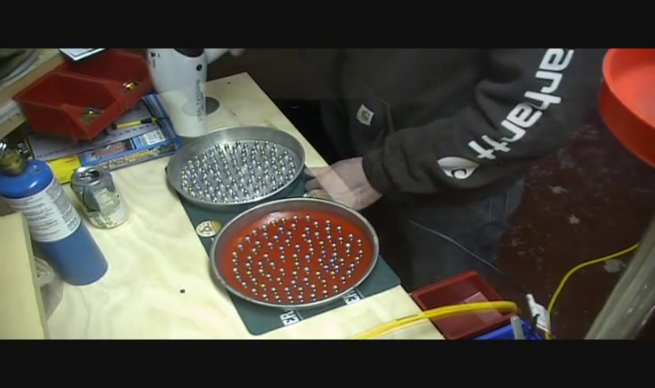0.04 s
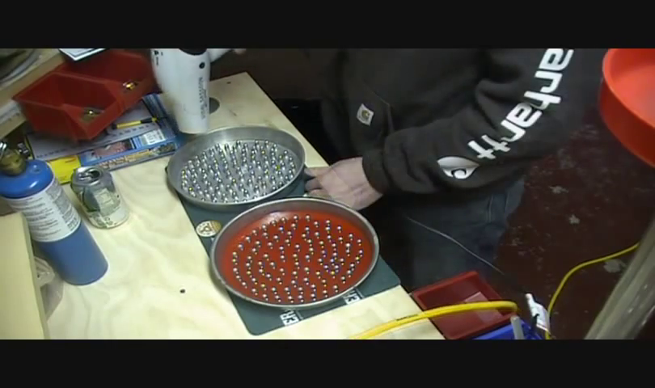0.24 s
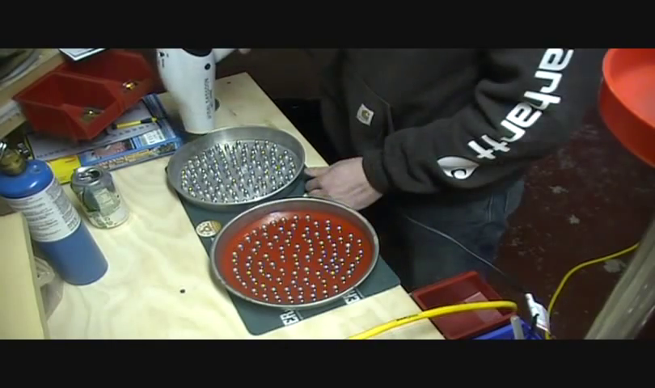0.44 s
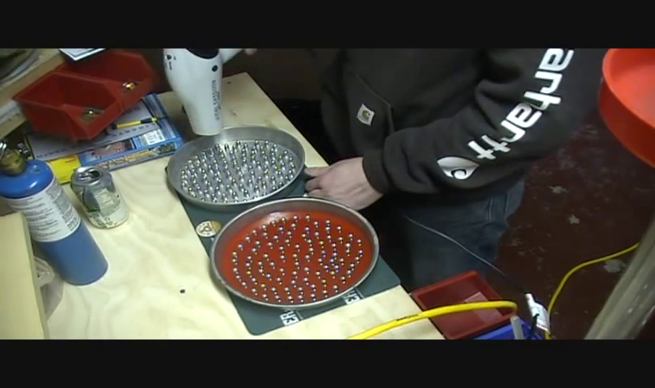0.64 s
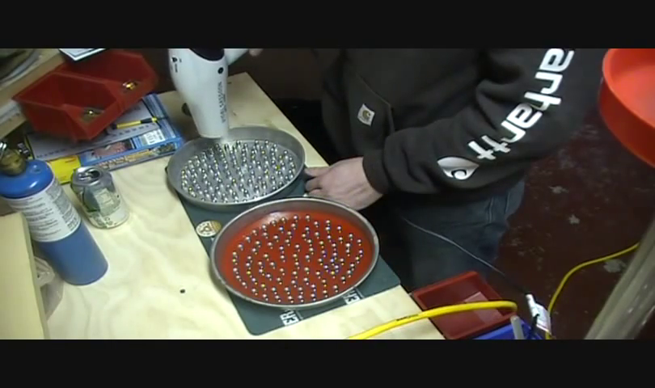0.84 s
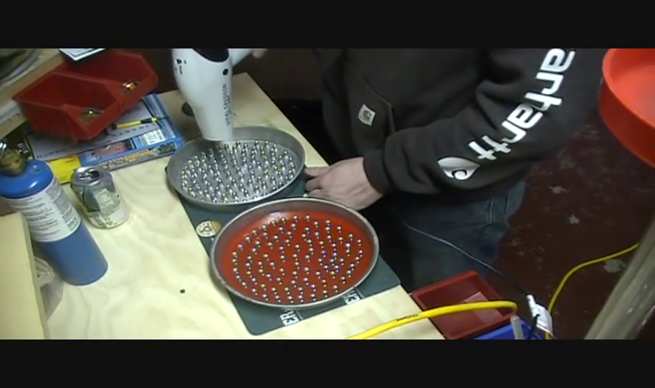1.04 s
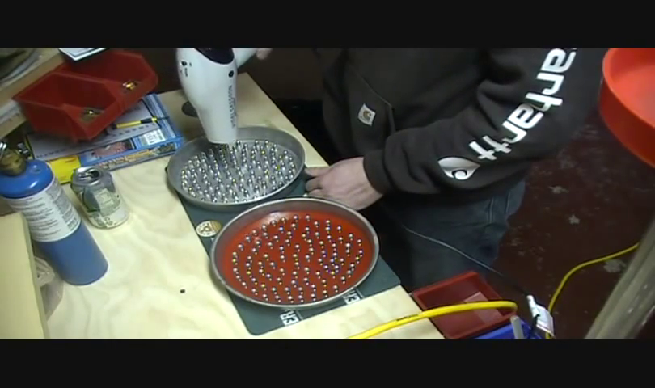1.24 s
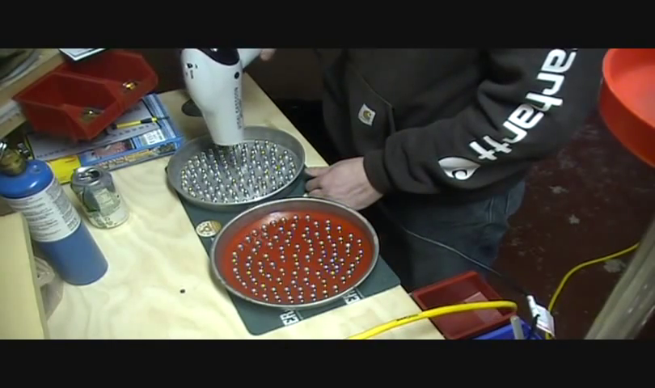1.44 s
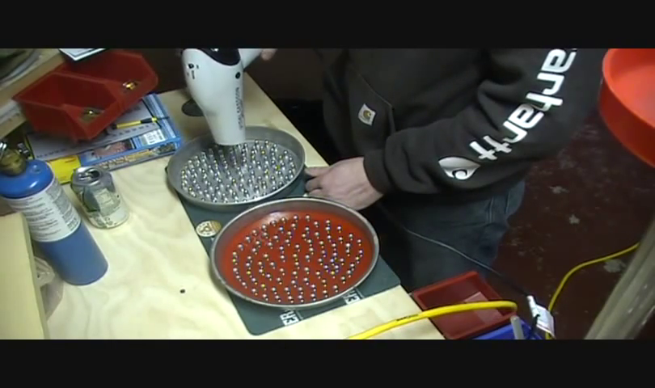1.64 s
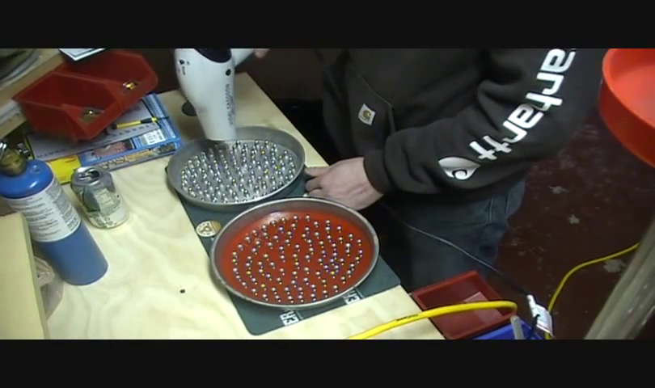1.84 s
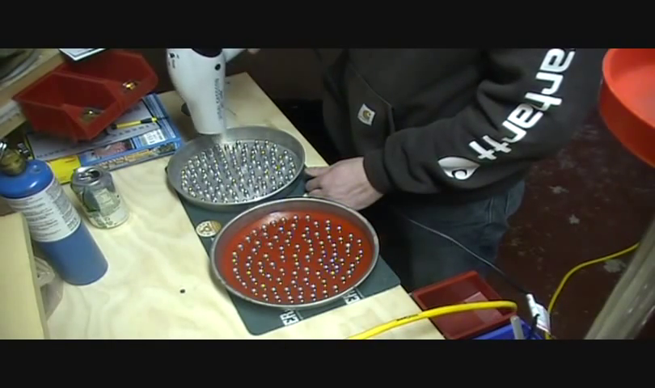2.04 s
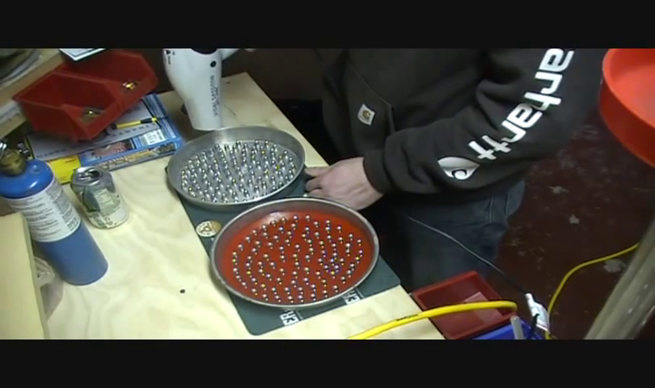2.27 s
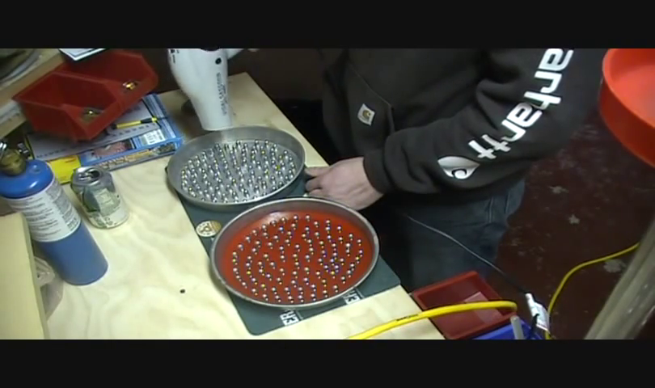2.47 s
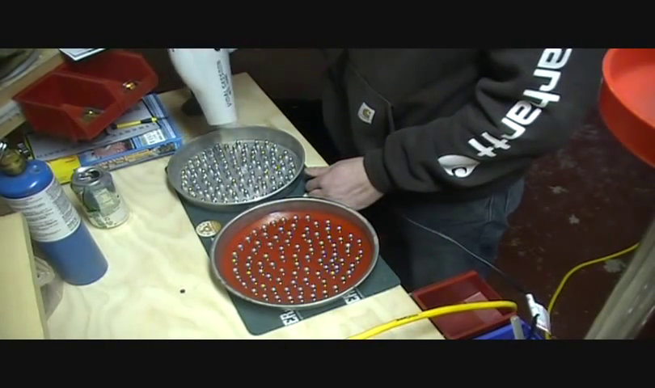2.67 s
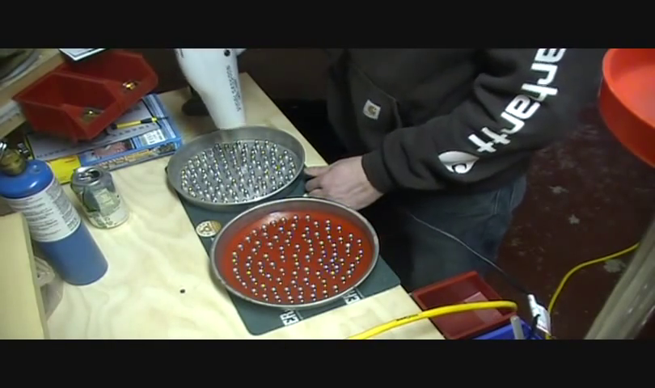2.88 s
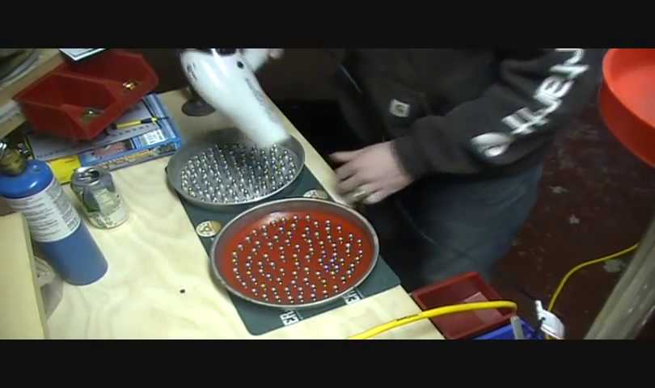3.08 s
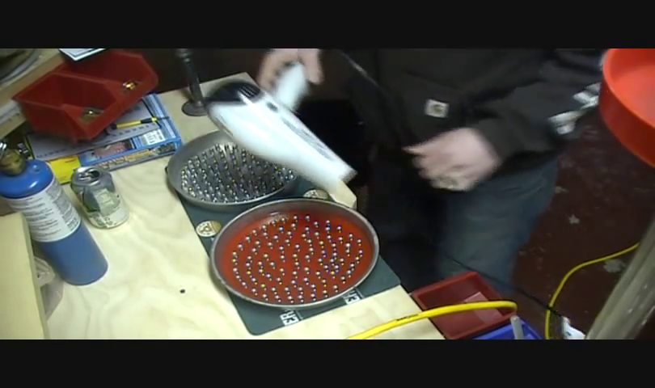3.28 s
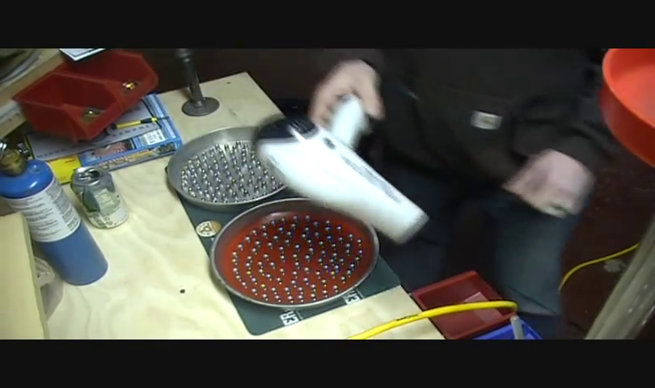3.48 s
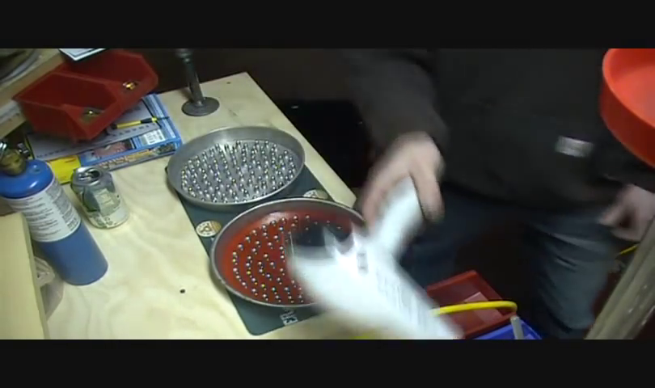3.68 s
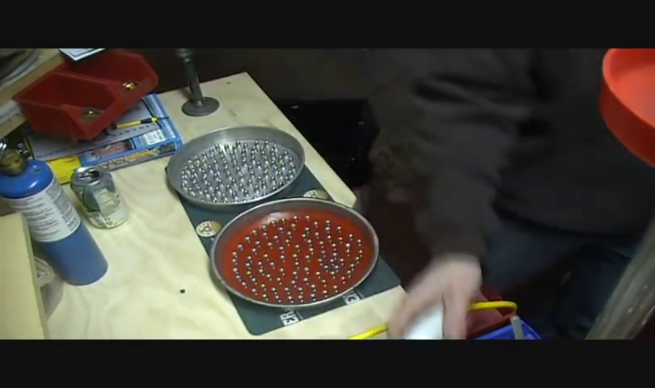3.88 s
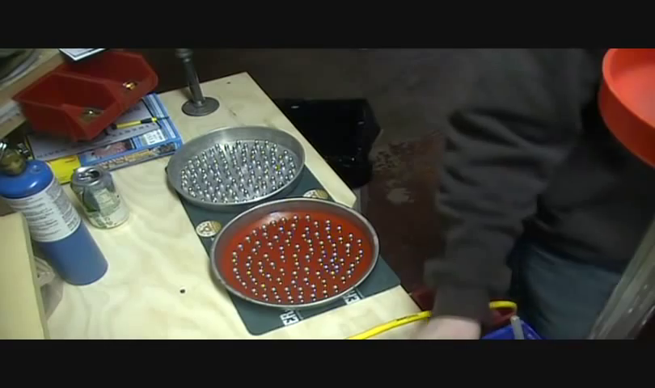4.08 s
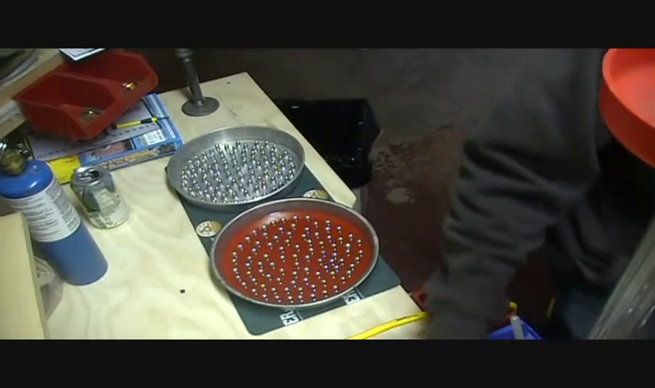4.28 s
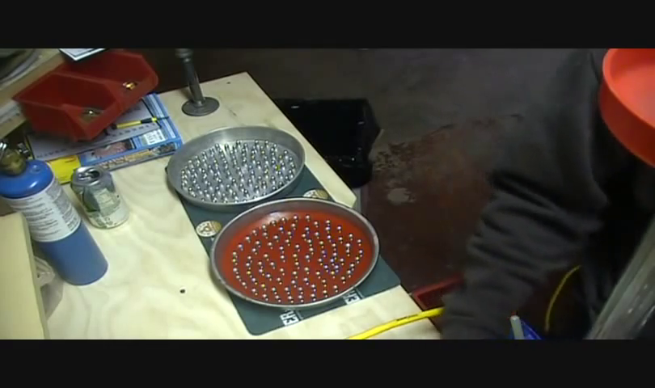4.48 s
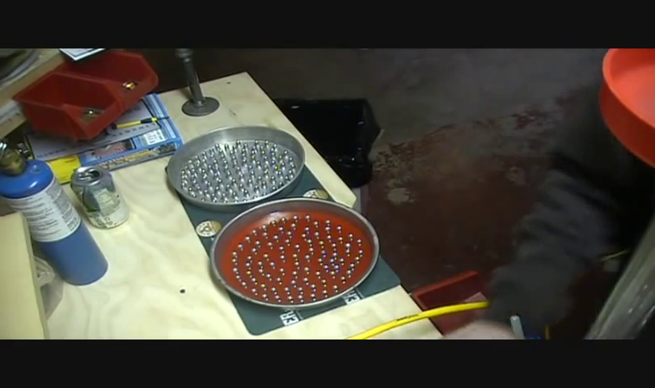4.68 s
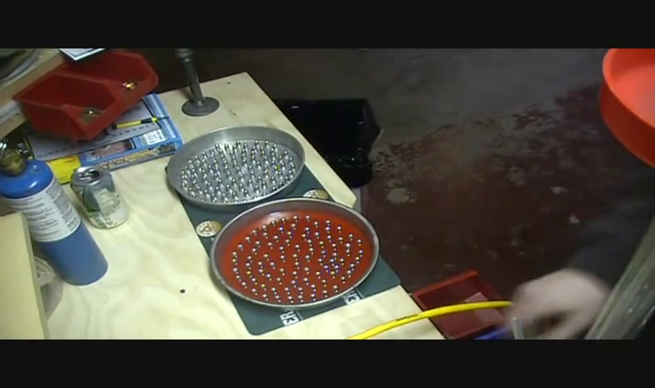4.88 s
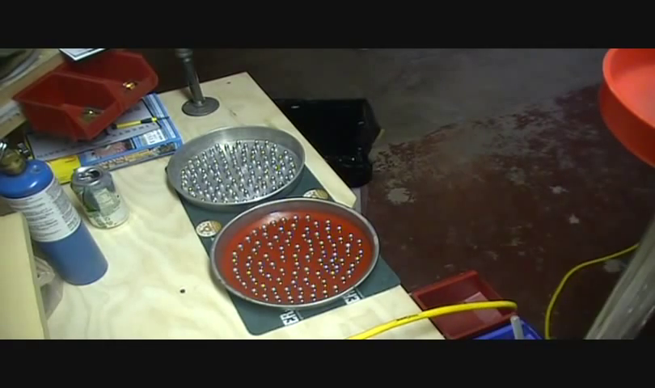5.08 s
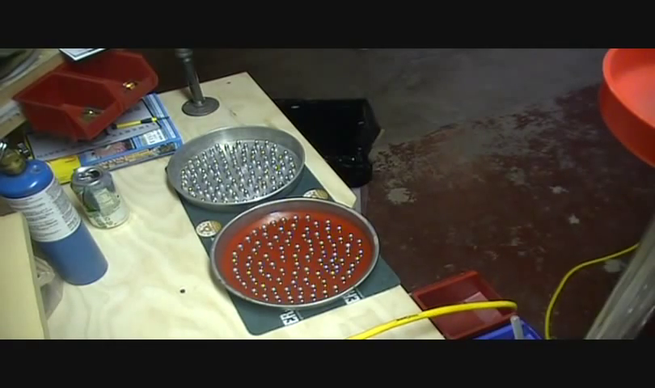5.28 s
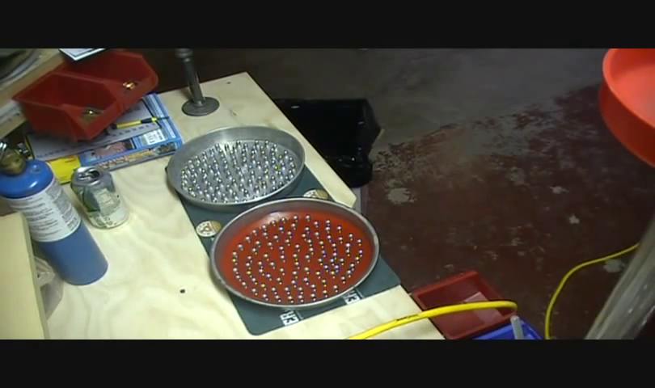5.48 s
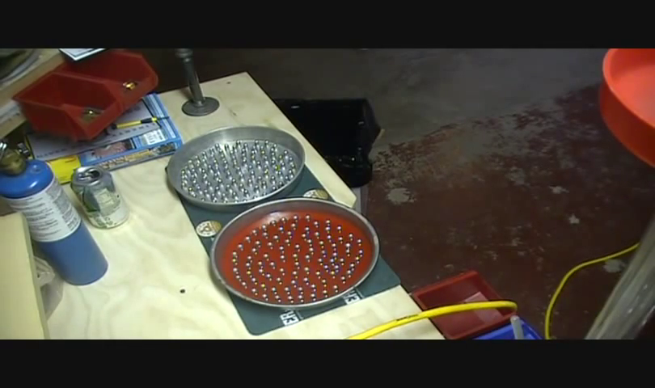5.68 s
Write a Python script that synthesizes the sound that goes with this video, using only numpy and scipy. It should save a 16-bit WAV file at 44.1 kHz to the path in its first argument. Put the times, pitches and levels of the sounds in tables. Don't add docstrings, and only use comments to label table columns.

```python
import sys
import numpy as np
from scipy import signal
from scipy.fft import rfft, irfft
from scipy.io import wavfile
from scipy.ndimage import uniform_filter1d

SR = 44100
rng = np.random.default_rng(int(sys.argv[2]) if len(sys.argv) > 2 else 0)


def rack_gain(trim_db):
    fader = np.asarray(trim_db, float)
    return 10 ** (fader / 20)


def digitize_waveform(pressure):
    field = np.atleast_2d(pressure).T
    bounded = np.clip(field, -1, 1)
    quanta = np.round(bounded * 32767).astype(np.int16)
    wavfile.write(sys.argv[1], SR, quanta)


N = 252252


def rms_one(x):
    return x / np.sqrt(np.mean(x ** 2) + 1e-20)


def in_time(rows):
    s, *columns = np.transpose(rows)
    return [np.interp(np.arange(N) / SR, s, c) for c in columns]


def at_hz(points, hz):
    return np.interp(np.log(hz), np.log(np.array(points)[:, 0]), np.array(points)[:, 1])


def drift(rate):
    r = np.exp(-80 * np.pi * rate / SR)
    slow = signal.lfilter([1], [1, -2 * r, r * r], rng.standard_normal(N // 40 + 2002))[2000:]
    return np.interp(np.arange(N) / 40, np.arange(len(slow)), rms_one(slow))


def ring(clicks, hz, t60):
    r = rack_gain(-60 / (max(t60, .001) * SR))
    w = 2 * np.pi * hz / SR
    return signal.lfilter([0, np.sin(w)], [1, -2 * r * np.cos(w), r * r], clicks + 1e-18)


def resonance(x, hz, width_hz):
    r = np.exp(-np.pi * width_hz / SR)
    poles = [1, -2 * r * np.cos(2 * np.pi * hz / SR), r * r]
    return signal.lfilter(np.array([1, 0, -1]) * (1 - r * r) / 2, poles, x)


def band_of(x, low_hz, high_hz):
    return signal.sosfilt(signal.butter(2, [low_hz, high_hz], "band", fs=SR, output="sos"), x)


def radiated(x, low_hz, high_hz):
    x = signal.sosfilt(signal.butter(3, low_hz, "high", fs=SR, output="sos"), x)
    return signal.sosfilt(signal.butter(4, high_hz, fs=SR, output="sos"), x)


# frequency in Hz, side minus mid in dB.
WIDTH = [(60, -15.5), (91, -17), (140, -24), (210, -16), (320, -17.5), (490, -18.5), (750, -14.5),
         (1150, -11.5), (1740, -15), (2660, -10), (4050, -13), (6180, -16.5), (9410, -1), (14300, -6.5)]


def to_pair(mid, side, colour_db=lambda hz: 0 * hz, wider_db=0):
    hz = np.maximum(np.fft.rfftfreq(len(mid), 1 / SR), 1)
    pair = rfft(mid) + rfft(side) * rack_gain(at_hz(WIDTH, hz) + wider_db) * [[1], [-1]]
    return irfft(pair * rack_gain(colour_db(hz)), len(mid))


def coloured(spectrum, wider_db):
    return rms_one(to_pair(*rng.standard_normal((2, N)), lambda hz: at_hz(spectrum, hz), wider_db))


SWELL_DB = 19


def strokes(rows, fall_db_per_s):
    t, out = np.arange(N) / SR, 0
    for s, swell_s, hold_s, db in rows:
        to_come = np.maximum(1 - (t - s) / swell_s, 0)
        over_s = np.maximum(t - s - swell_s - hold_s, 0)
        out = out + rack_gain(db - SWELL_DB * to_come - fall_db_per_s * over_s)
    return out


def coasting(lag_s):
    switch_off_s, coast_s = 2.504, .33
    fall = -np.maximum(np.arange(N) / SR - switch_off_s - lag_s, 0) / coast_s / np.log(10)
    return uniform_filter1d(fall, size=1100)


# frequency in Hz, level in dB per Hz.
AIR_COLOUR = [(35, -86), (60, -58.5), (190, -29), (256, -29.5), (354, -12), (500, -14), (793, -8),
              (1070, -7), (1660, -9), (2040, -5), (2750, -8.5), (6910, -6), (10500, -20), (13500, -34.5),
              (14800, -48.5)]
# frequency in Hz, width in Hz, height in dB.
BARREL_PEAKS = [(521, 55, 8), (729, 22, 8.5), (916, 27, 5), (1040, 90, 5.5), (1275, 20, 6), (1455, 60, 3),
                (1855, 30, 6), (1545, 60, 4), (2540, 60, 3), (2823, 50, -10.5), (3156, 25, 4),
                (3290, 57, 4), (4726, 110, 3), (4895, 60, 6.5), (6777, 200, 2), (6900, 1120, 3.5),
                (10100, 430, 2)]
# frequency in Hz, left minus right in dB.
TILT = [(60, -0.5), (500, 0.2), (1500, 1.5), (3500, 1.5), (5500, 0), (7500, -3), (9000, -2), (13000, 5)]


def barrel(hz):
    peaks_db = sum(db / (1 + (2 * (hz - f) / w) ** 2) for f, w, db in BARREL_PEAKS)
    return at_hz(AIR_COLOUR, hz) + peaks_db + at_hz(TILT, hz) * [[.5], [-.5]]


# time in seconds, level in dB, sizzle on the rim in dB.
JET = [(0.0, -21.5, -22), (0.19, -19, -12), (.3, -18, -16), (.66, -16.5, -16.5), (.78, -17.5, -20),
       (0.98, -16.5, -12.5), (1.11, -16.5, -14), (1.15, -18, -16), (1.3, -17.5, -15.5), (1.56, -18, -16.5),
       (1.64, -17, -9.5), (1.8, -17, -7.5), (1.855, -18, -21.5), (1.9, -16.5, -14), (2.07, -17.5, -18.5),
       (2.14, -16, -14.5), (2.32, -17, -11.5), (2.5, -16, -14.5)]
AIR_CENTRES_HZ = [700, 3000, 6300, 11000]
SIZZLE_SHARES = [0.036, -0.11, 0.003, 0.53]
AIR_DB_PER_DECADE = [35.2, 57.7, 71.4, 74.4]


def air(patchy_db, gust_db):
    jet_db, sizzle_db = in_time(JET)
    end = int(4 * SR)
    sizzle_moves = np.outer(SIZZLE_SHARES, sizzle_db - sizzle_db[:2 * SR].mean())
    speed_moves = np.outer(AIR_DB_PER_DECADE, coasting(lag_s=0.01))
    moves = (sizzle_moves + speed_moves)[:, :end]
    white, gust, out = rng.standard_normal((2, 2, end)), drift(22.0), 0
    edges = 58 * 2 ** (np.arange(25) / 3)
    for k, (low, high) in enumerate(zip(edges, edges[1:])):
        band = band_of(white[k % 2], low, high)
        centre = np.log(low * high) / 2
        shares = np.array([np.interp(centre, np.log(AIR_CENTRES_HZ), row) for row in np.eye(4)])
        flicker_db = (patchy_db * drift(11.0) + gust_db * gust)[:end]
        out = out + band * rack_gain(shares @ moves + flicker_db)
    out = to_pair(*out, barrel, wider_db=0.0)
    out = np.pad(out / np.std(out[:, :2 * SR]), ((0, 0), (0, N - end)))
    fade_out = np.clip((3.6 - np.arange(N) / SR) / .2, 0, 1)
    return out * rack_gain(jet_db - 0.72) * fade_out


# time in seconds, nozzle lift in cm, blade tone in dB.
WAVING = [(0, 3.8, -27.5), (.15, 3.74, -27), (.3, 2.8, -31), (.55, 0.36, -34), (.8, 2.2, -33),
          (.95, 0.55, -34), (1.1, 6.2, -28), (1.2, 5.7, -32.5), (1.35, 5.6, -32), (1.5, 4.5, -26.5),
          (1.59, 5.1, -33.5), (1.64, 4.9, -27), (1.69, 5.6, -42), (1.77, 4.4, -29), (1.86, 3.2, -38.5),
          (1.97, 4.4, -29.5), (2.05, 5.2, -32.5), (2.13, 7.8, -36.5), (2.19, 5.1, -31.5), (2.27, 0.78, -34),
          (2.33, 1.5, -38), (2.43, 0.84, -31.5), (2.47, 2.5, -34), (2.55, 2.5, -35)]
# time in seconds, blade rate in Hz.
BLADE_RATE = [(0, 2031), (.3, 2026), (.5, 2024), (1.1, 2023), (1.34, 2024), (1.5, 2030), (1.65, 2040),
              (1.82, 2052), (2.0, 2055), (2.14, 2045), (2.3, 2041), (2.44, 2031), (2.55, 2028)]
# time in seconds, dB under the running level, pull on the pitch in %.
COAST_TONE = [(2.5, 0, 0), (2.512, -5, -3), (2.53, 0, -1), (2.548, -4, 3), (2.56, -3, 2), (2.585, -1, 7),
              (2.605, -1, 1), (2.63, -4, -3), (2.66, -5, 0), (2.72, -6, -1), (2.78, -5, -1), (2.8, -26, 0),
              (2.95, -36, 0), (3.1, -70, 0)]
MULTIPLES_DB = [-1, -2.5, -10]
TONE_FADE_DB = [0, 40000, 40000]
# frequency in Hz, width in Hz, level in dB.
DUCT = [(1920, 24, 8.5), (1745, 14, 15.5), (1560, 15, 2.5), (1300, 11.9, 10), (900, 14, -5)]
# turns of the 7-blade shaft, level in dB, dB lost per tenfold drop in speed.
SHAFT = [(5, -20, 70), (6, -21, 80), (8, -20, 50), (11, -24, 28), (28, -22, 45)]


def impeller(waver_db, wander, rattle_db):
    (blade_hz,), (lift_cm, tone_db) = in_time(BLADE_RATE), in_time(WAVING)
    slow, (coast_db, pull) = np.maximum(coasting(0), -1), in_time(COAST_TONE)
    blade_hz = blade_hz * 10 ** slow * (1 + pull / 100)
    unsteady_hz = blade_hz * (1 + wander / 3000 ** np.maximum(slow, -.3) * drift(20.0))
    phase = 2 * np.pi * np.cumsum(unsteady_hz) / SR
    pan_detour_cm = 33.8
    lag = 2 * np.pi * blade_hz * (pan_detour_cm + lift_cm) / 34300
    echo = rack_gain(240 * slow)
    unsteady_db = waver_db + rattle_db * (slow < -.01)
    tone = 0
    for k, db, law in zip((1, 2, 3), MULTIPLES_DB, TONE_FADE_DB):
        level_db = tone_db + coast_db + db - law * slow ** 2 + unsteady_db * drift(18.0)
        tone = tone + rack_gain(level_db) * (np.sin(k * phase) + echo * np.sin(k * (phase - lag)))
    tone = tone + sum(rack_gain(db) * resonance(tone, hz, width_hz) for hz, width_hz, db in DUCT)
    shaft = 0
    for turns, db, loss_db in SHAFT:
        housing_db = 11 / (1 + (2 * (turns * blade_hz / 7 - 745) / 110) ** 2)
        level_db = db + loss_db * slow + housing_db + 2 * waver_db * drift(12.0)
        shaft = shaft + rack_gain(level_db) * np.sin(turns * phase / 7)
    stall_s = 3.1
    stalled_db = -150 * np.maximum(np.arange(N) / SR - stall_s, 0)
    return np.sqrt(2) * (tone + rack_gain(-23.0 + stalled_db) * shaft)


# frequency in Hz, level in dB per Hz.
HUSH_COLOUR = [(24, -79), (40, -53), (102, -7.5), (818, -1.5), (1760, -8), (2150, -7.5), (3110, -13),
               (6870, -16.5), (11300, -31), (14800, -76)]


def hush(level_db):
    return rack_gain(level_db) * coloured(HUSH_COLOUR, wider_db=12.0)


# frequency in Hz, level in dB, t60 in seconds.
STOOL_FRAME = [(164, -17.5, 0.14), (286, -12, 0.092), (444, -13, 0.11), (587, 5, 0.11), (696, 7.5, 0.024),
               (950, 0, 0.025), (1430, -3.5, 0.12), (1520, -2, 0.029), (2210, -45, 0.034)]
BOX = [(490, -9, 0.064), (655, 4, 0.042), (757, 5, 0.1), (914, 8, 0.066), (960, -8, 0.059),
       (1300, -7.5, 0.038), (1510, -3.5, 0.11), (2175, -7, 0.095)]
FLOOR = [(101, -22.5, 0.17), (160, 0, 0.05), (232, -22, 0.2), (346, -12.5, 0.28), (446, -10, 0.27),
         (720, -8, 0.1), (1150, -10, 0.023), (1786, 7, 0.038)]
BENCH = [(335, -16, 0.3), (602, -10, 0.06), (750, -13.5, 0.27), (960, 13.5, 0.0079), (1300, 11.5, 0.016),
         (1740, 2.5, 0.028), (2960, 1.5, 0.035), (1082, -11, 0.071)]
TRAY = [(970, -10, .03), (1464, -5, 0.04), (1916, -2, 0.04), (2110, 6, 0.05), (2400, 2, 0.03),
        (2692, 7, 0.04), (2993, 12, 0.04), (3250, 8, .025), (3570, 4, 0.025), (3950, 4, 0.03),
        (4210, 2, 0.03), (4899, -4, 0.04), (5200, -5, .03)]
TIN = [(402, -3.5, 0.074), (713, -2, 0.3), (851, -3, 0.25), (1039, -7, 0.28), (1254, -13, 0.12),
       (2010, -4, 0.25), (2230, -3, 0.23), (2580, 0, 0.14), (3050, -5, 0.15), (3180, -5.5, .4),
       (3542, 5, 0.088), (4580, -4, .16), (5000, 1, 0.06), (6050, 4.5, 0.1)]
SHELL = [(742, 0, .2), (1280, -14, .15)]
BODIES = {"shell": SHELL, "leg": STOOL_FRAME, "stool": STOOL_FRAME, "box": BOX,
          "floor": FLOOR, "bench": BENCH, "tray": TRAY, "tin": TIN}


def body_ring(push, body, spread, damping):
    modes = 0
    for k, (hz, db, t60) in enumerate(BODIES[body]):
        pair = ring(push, hz, t60 / damping) + .6 * ring(push, hz * 1.013, t60 / damping)
        modes = modes + np.cos(np.pi * k) * rack_gain(db + spread[k]) * pair
    lowest_hz = BODIES[body][0][0]
    return signal.sosfilt(signal.butter(2, .75 * lowest_hz, "high", fs=SR, output="sos"), modes)


# time in seconds, flick in dB, contact in Hz, ring of the body in dB.
KNOCKS = [(3.392, -19.5, 1460, -12.5), (3.725, -53, 1000, 15.5), (3.734, -55, 900, 9),
          (3.743, -55, 900, 15.5), (3.761, -21, 980, -3.5), (3.850, -45, 900, -9), (3.905, -45, 900, -11),
          (3.944, -45.5, 1300, -13), (4.0251, -20.5, 1300, -5), (4.074, -29, 1300, -4),
          (4.152, -38, 1400, -4), (4.3563, -6.5, 1670, -16), (4.386, -35.5, 900, 5.5),
          (4.5921, -2.5, 1830, -19), (5.02, -50, 6000, -39), (5.3017, -24.5, 3000, -4),
          (5.3057, -27, 2800, -3.5), (5.590, -28.5, 2500, -12), (2.83, -64.5, 746, 22.5),
          (2.97, -73.5, 745, 30), (3.125, -68, 750, 11)]
STRUCK = "leg box box box box box box box stool stool stool floor floor bench tray tray tray tin shell shell shell".split()
PLACES = {"shell": (.4, -30, 9, 0.2), "leg": (1.5, -20, -3, 0.75), "stool": (1, -1, -3, 0.55),
          "box": (1.5, -2, 1, 0.44), "floor": (1.7, -14, 1.1, 0.26), "bench": (1.3, -9, -2.5, 0.55),
          "tray": (-2, 1, -0.5, 0.84), "tin": (-1.0, 2, 0, 0.62)}


def knocks(cycles, chatter_s, crack_s):
    direct, to_room, span = np.zeros((2, N)), np.zeros(N), SR // 2
    chance, age = rng.standard_normal((len(KNOCKS), 2, span)), np.arange(span) / SR
    click = 1. * (age == 0)
    for (s, flick_db, contact_hz, ring_db), body, (grit, spread) in zip(KNOCKS, STRUCK, chance):
        pan_db, crack_db, room_db, loose = PLACES[body]
        contact_s = cycles / contact_hz
        flick = np.diff(ring(ring(click, contact_hz, contact_s), contact_hz, contact_s), prepend=0)
        flick = flick / np.abs(flick).max()
        bursts = [grit * np.exp(-age / crack_s), click * np.sqrt(crack_s * SR / 2)]
        crack, snap = band_of(bursts, max(1.2 * contact_hz, 900), 8000)
        rattle = grit * np.exp(-age / chatter_s) / np.sqrt(chatter_s * SR)
        chatter = (1 - loose) * click + loose * rattle
        modes = rack_gain(ring_db) * body_ring(chatter, body, spread, damping=1)
        blurred = rack_gain(ring_db) * body_ring(click, body, spread, damping=6)
        at = int(s * SR)
        near = rack_gain(flick_db) * (flick + rack_gain(crack_db) * crack + modes)
        direct[:, at:at + span] += (near * rack_gain([[pan_db / 2], [-pan_db / 2]]))[:, :N - at]
        far = rack_gain(flick_db + room_db) * (flick + rack_gain(crack_db - 3.0) * snap + blurred)
        to_room[at:at + span] += far[:N - at]
    return direct, to_room


# frequency in Hz, level in dB per Hz.
RUSTLE_COLOUR = [(2500, -26), (4000, -13.5), (5000, -10), (7300, -9.5), (8500, -20), (11000, -26.5),
                 (14500, -44)]
RASP_COLOUR = [(500, -23), (1200, -5.5), (2200, -3), (3500, -8.5), (5000, -14), (9000, -48)]
SHUFFLE_COLOUR = [(80, -62), (300, -6), (700, 0.5), (1200, -2), (2000, -4.5), (4000, -42.5)]
# start, swell and hold in seconds, level in dB.
RUSTLES = [(2.85, 0.064, 0.33, -61.5), (3.15, 0.088, 0.037, -68), (3.3, 0.23, 0.042, -49),
           (3.65, 0.068, 0.234, -64.5), (4.03, 0.024, 0.66, -59.5), (4.25, 0.12, 0.026, -56),
           (4.49, 0.031, 0.033, -74), (4.92, 0.0156, 0.051, -58), (5.0, 0.025, 0.013, -56),
           (5.05, .03, 0.092, -71.5), (5.16, 0.022, 0.082, -54.5), (5.29, 0.022, 0.21, -48.5)]
SLIDES = [(3.25, 0.21, 0.11, -56), (3.5, 0.094, .01, -48.5), (3.63, 0.036, .28, -79),
          (4.03, 0.014, 0.18, -52), (4.25, .05, 0.3, -62), (4.95, 0.066, .12, -64.5),
          (5.15, 0.04, 0.029, -52.5), (5.29, 0.012, 0.11, -45), (5.43, .03, 0.084, -54.5)]
STEPS = [(3.05, 0.043, 0.34, -64), (3.45, 0.14, 0.011, -39), (3.65, 0.11, 0.096, -51),
         (4.03, 0.015, 0.012, -35.5), (4.15, 0.018, 0.62, -53), (4.95, 0.195, 0.28, -59),
         (5.29, 0.066, 0.06, -52), (5.47, 0.1, 0.04, -55)]


def cloth(grain_db):
    bright = strokes(RUSTLES, fall_db_per_s=195) * rack_gain(grain_db * drift(40.0))
    bright = bright * coloured(RUSTLE_COLOUR, wider_db=0.0)
    rasp = strokes(SLIDES, fall_db_per_s=181) * rack_gain(grain_db * drift(50.0))
    rasp = rasp * coloured(RASP_COLOUR, wider_db=-3.0)
    dull = strokes(STEPS, fall_db_per_s=192) * rack_gain(grain_db * drift(22.0))
    dull = dull * coloured(SHUFFLE_COLOUR, wider_db=1.5)
    return bright + rasp + dull


# start, swell and hold in seconds, level in dB, pitch in Hz.
SQUEAKS = [(2.86, .05, .12, -55, 1290), (4.495, .02, .045, -61, 4800), (4.53, .02, .02, -63, 5800),
           (5.5, .03, .05, -62, 970), (3.51, .03, .05, -52, 980)]


def squeaks(sharpness):
    noise, out = rng.standard_normal(N), 0
    for *row, hz in SQUEAKS:
        squeak = resonance(resonance(noise, hz, hz / sharpness), hz, hz / sharpness)
        out = out + strokes([row], fall_db_per_s=260) * rms_one(squeak)
    return out


# start, swell and hold in seconds, level in dB.
DRAG = [(3.15, 0.16, 0.029, -42), (3.3, 0.048, 0.025, -42), (3.385, 0.0082, 0.019, -40),
        (3.41, 0.042, .01, -29.5), (3.5, 0.037, 0.035, -36), (3.62, 0.043, 0.071, -48)]
# frequency in Hz, level in dB, t60 in seconds.
DRAGGED_FRAME = [(424, 2.5, 0.088), (590, 4.5, 0.079), (625, 1.5, 0.071), (710, -7, 0.056),
                 (943, -2.5, 0.067), (1400, -4, 0.069), (1470, -1, .06), (2300, -17, .04)]


def stool(slips_per_s, uneven_db):
    slipping = rng.random(N) < slips_per_s / SR
    heights = rack_gain(uneven_db * np.minimum(rng.exponential(1, N), 4))
    slips = slipping * heights * rng.choice([-1, 1], N)
    frame = sum(rack_gain(db) * ring(slips, hz, t60) for hz, db, t60 in DRAGGED_FRAME)
    return strokes(DRAG, fall_db_per_s=296) * rms_one(radiated(frame, low_hz=333, high_hz=6000))


# frequency in Hz, t60 in seconds.
SHOP_T60 = [(100, 0.23), (500, 0.44), (1500, 0.37), (3000, 0.33), (6000, 0.26), (12000, 0.28)]
# frequency in Hz, level in dB.
SHOP_COLOUR = [(100, 9), (400, 4), (1000, 3), (1400, 1.5), (2000, -0.5), (2600, -0.5), (3500, 6),
               (7000, 1.5)]
# lag in seconds, level in dB.
EARLY = [(.003, -10), (.0075, -13), (0.0155, -19)]


def shop(x):
    t, tail = np.arange(int(.7 * SR)) / SR, 0
    white = rng.standard_normal((2, len(t)))
    for low in 50 * 2 ** np.arange(8):
        tail = tail + band_of(white, low, 2 * low) * rack_gain(-60 * t / at_hz(SHOP_T60, low * np.sqrt(2)))
    tail = to_pair(*tail, lambda hz: at_hz(SHOP_COLOUR, hz), wider_db=1.5)
    tail = tail * np.clip((t - .003) / .008, 0, 1)
    tail = tail / np.sqrt(np.sum(tail ** 2) / 2)
    for lag_s, db in EARLY:
        tail[:, int(lag_s * SR)] += rack_gain(db)
    return signal.fftconvolve(x[None], tail, axes=1)[:, :N]


def scene():
    tone = impeller(waver_db=1.4, wander=.0003, rattle_db=1.2)
    legs = stool(slips_per_s=560.0, uneven_db=5.0)
    direct, to_room = knocks(cycles=2.2, chatter_s=.004, crack_s=.003)
    echoes = shop(rack_gain(-13.0) * tone + rack_gain(-10.0) * legs + to_room)
    solid = radiated(rack_gain(-10.0) * legs + direct + echoes, low_hz=143, high_hz=7870)
    near = tone * rack_gain([[1.8], [.7]]) + solid + cloth(grain_db=1.2)
    stream = air(patchy_db=0.56, gust_db=0.5)
    return stream + near + hush(level_db=-58) + squeaks(sharpness=6.9)


NARROWED = [(.17, .23), (.35, .37), (.47, .5), (.56, .58), (.95, 1.03), (1.11, 1.16), (1.23, 1.26),
            (1.36, 1.38), (1.62, 1.81), (1.96, 1.99), (2.13, 2.18), (2.26, 2.44), (2.51, 3.42)]


def low_pass(x):
    return signal.sosfilt(signal.butter(12, 14940, fs=SR, output="sos"), x)


def record(dry):
    mid, side = (dry[0] + dry[1]) / 2, (dry[0] - dry[1]) / 2
    t = np.arange(N) / SR
    dropped = uniform_filter1d(sum((t > a) & (t < b) for a, b in NARROWED) * 1., size=300)
    notch = signal.butter(8, [4300, 8100], "bandstop", fs=SR, output="sos")
    side = side - dropped * (side - signal.sosfiltfilt(notch, side))
    return low_pass(np.array([mid + side, mid - side]))


dry = scene()
out = record(dry)
digitize_waveform(out)
```